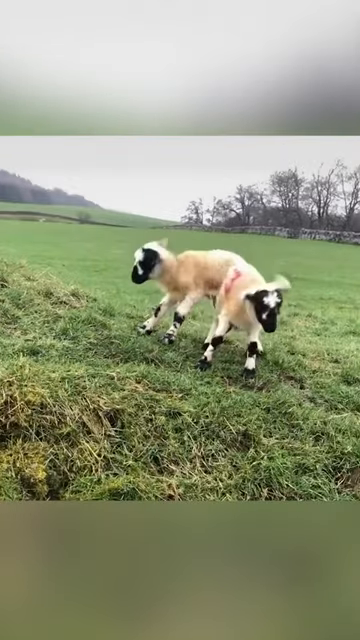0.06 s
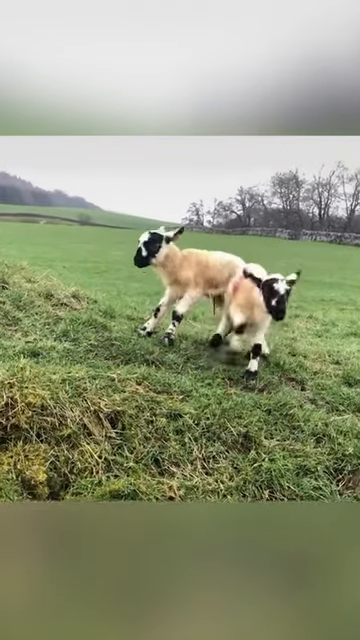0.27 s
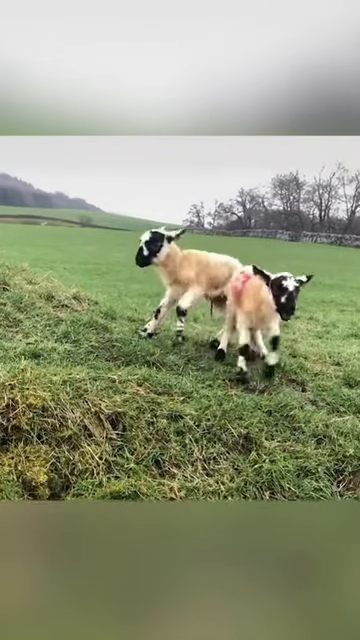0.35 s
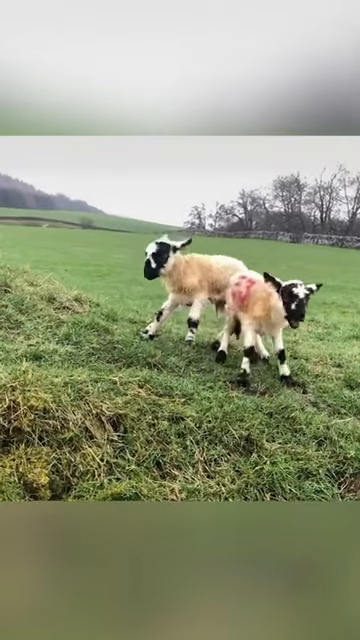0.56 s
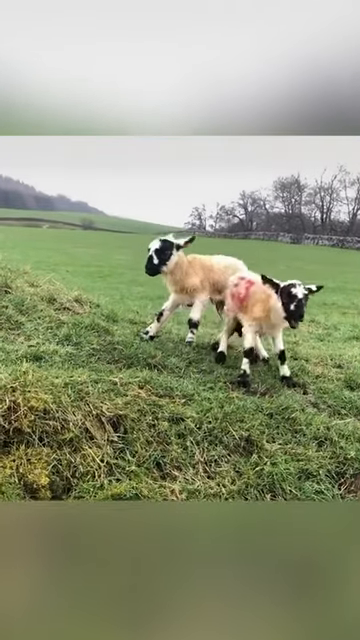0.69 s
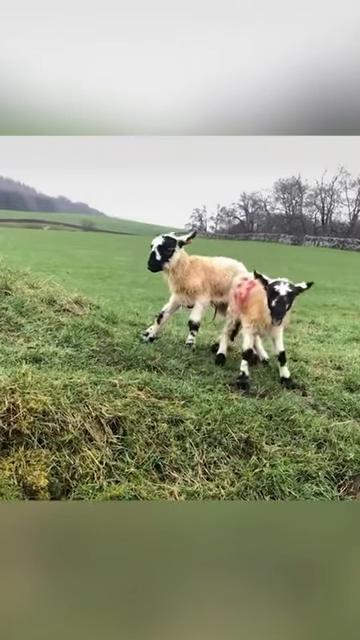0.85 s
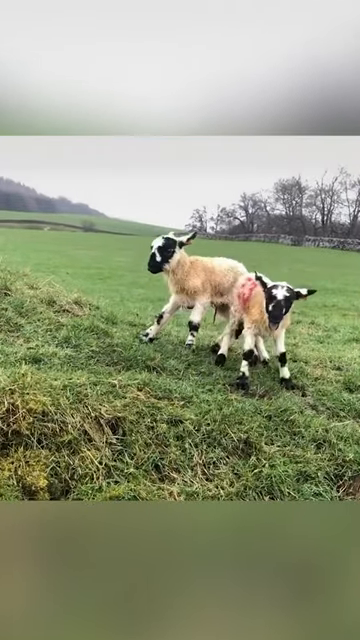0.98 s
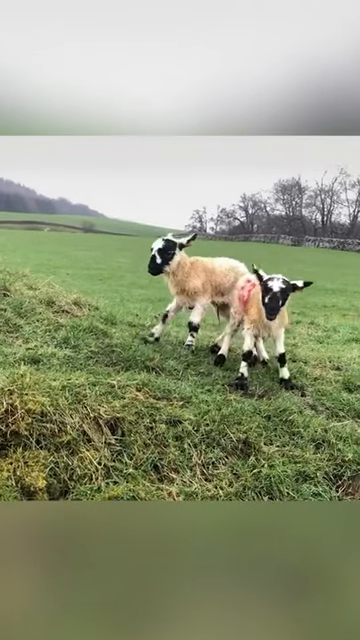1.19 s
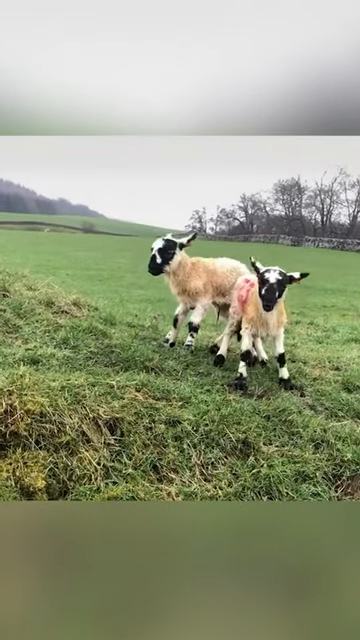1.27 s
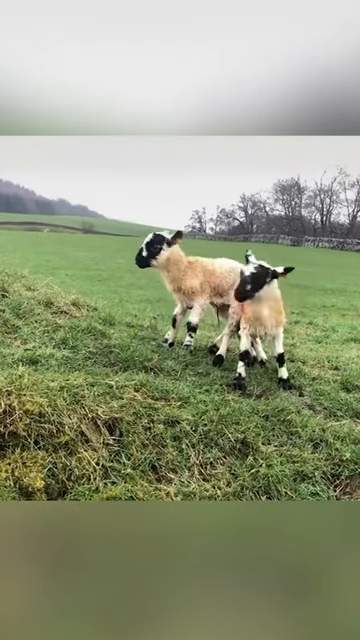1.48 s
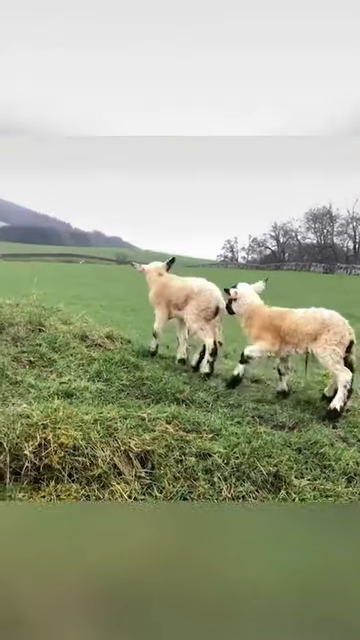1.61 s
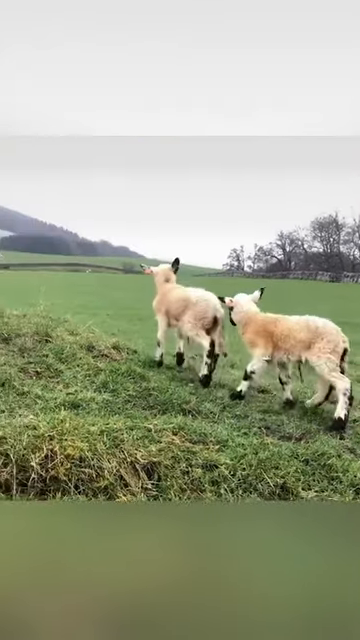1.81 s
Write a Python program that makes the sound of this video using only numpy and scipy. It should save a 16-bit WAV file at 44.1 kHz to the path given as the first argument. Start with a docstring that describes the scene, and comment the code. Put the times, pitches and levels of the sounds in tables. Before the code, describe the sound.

One hoarse, wavering lamb bleat close by, then a few soft thuds on grass.

```python
"""Lamb on a hillside

One bleat, close to a single microphone, on a grassy slope in faint wind. The vocal folds pulse
through one strong throat resonance and a bright cluster above it; the voice starts hoarse,
quavers, rasps in patches and drops at the end. Soft thuds on the turf follow."""
import sys
import numpy as np
from scipy import signal
from scipy.fft import rfft, irfft
from scipy.io import wavfile
from scipy.ndimage import uniform_filter1d

SR = 44100
rng = np.random.default_rng(int(sys.argv[2]) if len(sys.argv) > 2 else 0)


def dump_mix(stems):
    """Bounce the given channels to the path in sys.argv[1] as a 16-bit WAV at rate SR."""
    frames = np.atleast_2d(stems).T  # one column per channel
    limited = np.clip(frames, -1, 1)  # hard clip at full scale
    pcm = np.round(limited * 32767).astype(np.int16)
    wavfile.write(sys.argv[1], SR, pcm)


N = 81585
T = np.arange(N) / SR

# hoarseness of the voice: time_s, relative_db
HOARSENESS = [(.12,-1.5),(.18,-3.5),(.225,-23),(.255,-16),(.29,-32),(.35,-21),(.445,-17.5),(.535,-19),(.56,-20),(.63,-20),(.69,-32),(.795,-19.5),(.825,-15.5),(.85,-19),(.88,-14),(.92,-1.5)]
# main throat resonance: time_s, level_db
BODY_LEVEL = [(0.12, -49), (0.14, -46.5), (0.186, -57), (0.208, -37.5), (0.238, -34), (0.256, -42.5),
              (0.28, -29.5), (0.482, -22.5), (0.498, -27), (0.562, -21.5), (0.714, -24), (0.758, -20),
              (0.82, -27), (0.86, -19.5), (0.91, -35.5), (0.925, -55)]
# bright cluster of overtones: time_s, level_db
CLUSTER_LEVEL = [(.12,-60),(.136,-49),(.174,-47),(.21,-34),(.238,-27),(.256,-35.5),(.274,-26),(.3,-24),(.4,-25),(.435,-25.5),
                 (.505,-24),(.558,-27),(.608,-24.5),(.8,-25),(.818,-23),(.86,-28.5),(.9,-36.5),(.925,-47.5)]
# highest overtones: time_s, ring_db, top_db
TREBLE_LEVEL = [(.12,-70,-75),(.185,-62,-70),(.22,-46.5,-59),(.255,-49,-54),(.29,-43,-48.5),(.44,-40,-48),(.565,-44,-52),(.61,-38.5,-49.5),(.82,-37,-44.5),(.925,-55.5,-61)]
# broad hiss at the lips, bypassing the throat resonances: frequency_hz, gain_db
LIP_COLOUR = [(1500,-31),(2600,-6),(5000,-2),(7500,2.5),(10000,-1),(15000,-13)]


def lamb(attack_s=0.018, release_s=0.013):
    """The bleat, close up: tone and breath pass the throat and are blended in four registers."""
    rasp = amp(curve(HOARSENESS) + 3)
    pulses, puffs = vocal_folds(rasp)
    voice, hiss = throat(np.array([-pulses, puffs]))
    hiss = hiss + amp(-9) * colour(puffs, LIP_COLOUR)
    # low_hz, high_hz, level_db, extra_rasp_db; a nasal gap lies between the first two
    registers = [(600, 1980, curve(BODY_LEVEL), -33),
                 (2256, 8200, curve(CLUSTER_LEVEL), 0),
                 (8200, 9700, curve(TREBLE_LEVEL), 2),
                 (9700, SR, curve(TREBLE_LEVEL, column=2), 5)]
    bleat = 0
    for low_hz, high_hz, level_db, extra_rasp_db in registers:
        share = np.minimum(rasp * amp(extra_rasp_db), 1)
        tone = steady(band(voice, low_hz, high_hz))
        breath = steady(band(hiss, low_hz, high_hz), size=1500)
        bleat += amp(level_db) * (np.sqrt(1 - share ** 2) * tone + share * breath)
    onset = np.clip((T - BODY_LEVEL[0][0]) / attack_s + 0.5, 0, 1)
    release = np.exp(-np.maximum(T - BODY_LEVEL[-1][0], 0) / release_s)
    return bleat * onset * release


# quaver and final drop of the bleat: time_s, pitch_hz
BLEAT_PITCH = [(.12,415),(.145,430),(.17,405),(.19,388),(.23,405),(.255,396),(.28,415),(.31,421),(.323,410),(.365,420),(.388,434),(.42,440),(.47,444),(.502,428),(.54,452),(.6,446),(.632,442.5),(.662,454),(.7,442.5),(.748,449.5),(.788,437),(.814,422),(.836,436),(.858,440),(.878,425),(.895,365),(.92,315)]
# moments when the upper cluster breaks into rasp: middle_s, half_length_s, rasp_share
VOICE_BREAKS = [(0.663,0.022,0.95),(0.761,0.03,1),(0.895,0.015,0)]


def vocal_folds(rasp, jitter=0.0017, rough_jitter=0.01185, shimmer=0.099, doubling=0.34):
    """The folds pulse a little unevenly and let a puff of breath through in each cycle."""
    waver = jitter * wander(rate_hz=58) + rough_jitter * rasp * wander(rate_hz=255)
    cycles = np.cumsum(curve(BLEAT_PITCH) * (1 + waver)) / SR
    pulses = unit(sum(np.cos(2 * np.pi * k * cycles) for k in range(1, 41)))
    pulses *= 1 + shimmer * wander(rate_hz=67)
    airflow = 0.45 + np.exp(-(cycles % 1) / 0.28)
    puffs = unit(airflow * rng.standard_normal(N))
    broken = sum(share * burst(middle_s, half_s) for middle_s, half_s, share in VOICE_BREAKS)
    broken = np.clip(broken, 0, 1)
    tone_to_breath = broken * puffs + (np.sqrt(1 - broken ** 2) - 1) * pulses
    pulses += band(tone_to_breath, 5950, 7700)
    # in the treble, strong and weak cycles alternate where the voice rasps
    pulses += doubling * rasp * np.cos(np.pi * cycles) * band(pulses, 3800, SR)
    return pulses, puffs


# mouth movement: time_s, shape (0 opening, 1 wide, 2 full voice, 3 straining)
MOUTH_SHAPE = [(.34,.02),(.4,1.4),(.52,1.32),(.57,1.37),(.76,2.23),(.815,2.8),(.855,2.34)]
# throat resonances: width_hz, then centre_hz, gain_db for each of the four mouth shapes
FORMANTS = [(304,1296,18.5,1320,10,1340,4,1350,-4), (152,2710,-11,2680,-8.5,2750,-7.5,2430,-5),
            (370,3480,-3.5,3620,4,3474,3,3440,1), (240,4220,-1,4020,7,4080,-1,4470,-4),
            (394,4660,4,4560,6,4580,4.5,4670,4.5), (265,5300,5,5330,5,5270,2,5200,6),
            (506,6200,-4.5,6520,-2,6160,-1,6270,-0.5), (490,7400,-8.5,7500,-14.5,7150,-3.5,7030,0),
            (390,8850,-10,8890,-9,8970,-7,8900,0), (3100,11300,-21,11400,-22,11300,-19,12600,-20)]


def throat(source):
    """The resonances slide and swell as the mouth changes shape."""
    shape, voiced = curve(MOUTH_SHAPE), 0
    for width_hz, *poses in FORMANTS:
        centre_hz = np.interp(shape, range(4), poses[::2])
        gain_db = np.interp(shape, range(4), poses[1::2])
        voiced += amp(gain_db) * resonate(source, centre_hz, width_hz)
    return voiced


# cracks in the voice: middle_s, half_length_s, level_db
VOICE_CRACKS = [(0.4,0.02,-38),(0.436,0.022,-35),(0.515,0.027,-33)]
# spectrum of their turbulence: frequency_hz, gain_db
TURBULENCE_COLOUR = [(3300,-24),(4000,-2),(4600,0),(5500,1.5),(6200,-2),(7600,-5),(8200,-15),(9000,-4),(10500,-15),(15000,-23)]


def cracks(flutter_db=4, flutter_hz=160):
    """Turbulence flutters irregularly while the voice cracks."""
    turbulence = band(colour(rng.standard_normal(N), TURBULENCE_COLOUR), 3300, SR)
    flutter = amp(flutter_db * wander(flutter_hz))
    envelope = sum(amp(db) * burst(middle_s, half_s) for middle_s, half_s, db in VOICE_CRACKS)
    return steady(turbulence * flutter, size=900) * envelope


# thin, fuzzy whistles above the voice: middle_s, half_length_s, level_db, pitch_hz, width_hz
BREATH_WHISTLES = [(0.32,0.051,-47,8880,87),(.325,0.041,-50,12400,450),(0.4,.025,-48,11500,500)]


def whistles():
    """The lamb's breath sings briefly in narrow, high resonances."""
    sound = 0
    for middle_s, half_s, level_db, pitch_hz, width_hz in BREATH_WHISTLES:
        whistle = resonate(rng.standard_normal(N), np.full(N, pitch_hz), width_hz)
        sound += amp(level_db) * burst(middle_s, half_s) * steady(whistle)
    return sound


# soft thuds on the ground: start_s, peak_db, pitch_hz, decay_s, scuff_db
TURF_THUDS = [(1.431,-34,131,0.005,-59),(1.456,-36.5,81,0.011,-37.5),(1.584,-40,99,0.0055,-65),(1.611,-40.5,75,0.0072,-52),(1.674,-35.5,92.6,0.0055,-71)]
# spectrum of the scuff: frequency_hz, gain_db
SCUFF_COLOUR = [(100,-2),(350,-5),(580,11),(900,-10),(3500,-32),(12000,-55)]
# a tiny rustle in the grass: start_s, level_db, centre_hz, decay_s
GRASS_RUSTLES = [(1.739,-51,3450,0.0018)]


def turf(sag_per_s=5.3, scuff_decay_s=0.014):
    """Each thud is a low push, sagging in pitch, with a scuff; the grass rustles once."""
    ground = np.zeros(N)
    scuff = unit(colour(rng.standard_normal(N), SCUFF_COLOUR))
    for start_s, peak_db, pitch_hz, decay_s, scuff_db in TURF_THUDS:
        age = np.maximum(T - start_s, 0)
        sagging_hz = pitch_hz / (1 + sag_per_s * age) * (age > 0)
        push = np.sin(2 * np.pi * np.cumsum(sagging_hz) / SR)
        ground += amp(peak_db) * swell(start_s, decay_s) * push
        ground += amp(scuff_db) * (age > 0) * np.exp(-age / scuff_decay_s) * scuff
    for start_s, level_db, centre_hz, decay_s in GRASS_RUSTLES:
        rustle = unit(band(rng.standard_normal(N), centre_hz / 1.3, centre_hz * 1.14))
        ground += amp(level_db) * swell(start_s, decay_s) * rustle
    return ground


# spectrum of the open air: frequency_hz, gain_db
WIND_COLOUR = [(12, -48), (20, 0), (64, -3.5), (129, 3), (416, -2), (667, -4), (1300, -9.5), (2330, -13.5),
               (4550, -22.5), (15500, -40)]
# strength of the wind: time_s, level_db
WIND_LEVEL = [(0,-47),(.5,-50.5),(1.0,-46),(1.35,-48.5),(1.85,-49)]
# low rumble against the wash: time_s, relative_db
WIND_RUMBLE = [(0,-6),(.8,-5.5),(1.2,-1.5),(1.85,-2.5)]


def wind(patchy_db=2.5, gust_db=-0.5):
    """Faint wind on the hillside, behind the lamb: a patchy wash over a gusty rumble."""
    spectrum = signal.stft(rng.standard_normal(N), nperseg=512)[2]
    patches = uniform_filter1d(rng.standard_normal(spectrum.shape), size=7, axis=0)
    patches = unit(uniform_filter1d(patches, size=7, axis=1))
    patchy_noise = signal.istft(spectrum * amp(patchy_db * patches), nperseg=512)[1][:N]
    wash = unit(colour(patchy_noise, WIND_COLOUR))
    rumble = band(wash, 1, 227)
    gusts = amp(curve(WIND_RUMBLE) + gust_db * wander(rate_hz=9.4))
    return amp(curve(WIND_LEVEL)) * (wash - rumble + rumble * gusts)


def amp(db):
    """Decibels to gain."""
    return 10 ** (np.asarray(db) / 20)


def unit(x):
    """Scales to rms 1."""
    return x / np.sqrt(np.mean(x ** 2) + 1e-20)


def curve(rows, column=1):
    """One column of a time table, at every sample."""
    rows = np.array(rows)
    return np.interp(T, rows[:, 0], rows[:, column])


def colour(x, points):
    """Causal filter shaped by rows of frequency_hz, gain_db."""
    points_hz, db = np.transpose(points)
    hz = abs(np.fft.fftfreq(4096, 1 / SR))
    log_gain = np.log(amp(np.interp(np.log(hz + 1), np.log(points_hz), db)))
    impulse = np.fft.ifft(np.exp(np.conj(signal.hilbert(log_gain)))).real
    return signal.fftconvolve(x, impulse[:len(impulse) // 2])[:len(x)]


def band(x, low_hz, high_hz):
    """Steep band-pass without delay."""
    hz = np.fft.rfftfreq(len(x), 1 / SR) + 1
    gain = 1 / (1 + (low_hz / hz) ** 20) / (1 + (hz / high_hz) ** 20)
    return irfft(rfft(x) * gain, len(x))


def resonate(x, hz, width_hz):
    """A steep resonance of gain 1 that follows the curve hz."""
    carrier = np.exp(2j * np.pi * np.cumsum(hz) / SR)
    pole = np.exp(-np.pi * width_hz / SR)
    envelope = signal.lfilter([(1 - pole) ** 2], [1, -2 * pole, pole * pole], x / carrier + 1e-18)
    return 2 * (carrier * envelope).real


def wander(rate_hz):
    """Slow random motion of rms 1."""
    hz = np.fft.rfftfreq(N, 1 / SR)
    return unit(irfft(rfft(rng.standard_normal(N)) / (1 + (hz / rate_hz) ** 4), N))


def steady(x, size=500):
    """Holds the short-term level at rms 1."""
    power = uniform_filter1d(uniform_filter1d(x ** 2, size), size)
    return x / np.sqrt(abs(power) + 1e-12)


def swell(start_s, decay_s):
    """A soft blow: rises to 1 in one decay time, then dies."""
    progress = np.maximum(T - start_s, 0) / decay_s
    return (progress * np.exp(1 - progress)) ** 2


def burst(middle_s, half_s):
    """A flat-topped window with soft edges."""
    return np.exp(-((T - middle_s) / half_s) ** 6)


def scene():
    """Lamb, wind and turf from one spot, the same in both channels."""
    bleat = lamb() + cracks() + whistles()
    return np.tile(bleat + wind() + turf(), (2, 1))


def record(dry, dip_s=1.402, dip_db=-20, hold_s=0.009, return_s=0.016, cutoff_hz=15750):
    """The sound drops out briefly once, as at an edit cut, and the highest treble is cut off."""
    fall = np.clip((T - dip_s) / 0.00067, 0, 1)
    recovery = np.clip(1 - (T - dip_s - hold_s) / return_s, 0, 1)
    lowpass = signal.firwin(511, cutoff_hz, window=("kaiser", 9), fs=SR)
    return signal.oaconvolve(dry * amp(dip_db * fall * recovery), lowpass[None], "same")


dry = scene()
out = record(dry)
dump_mix(out)
```